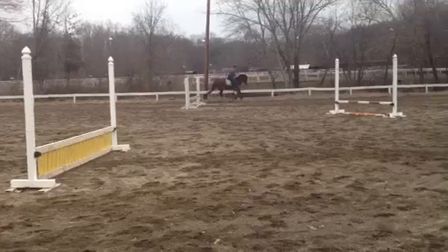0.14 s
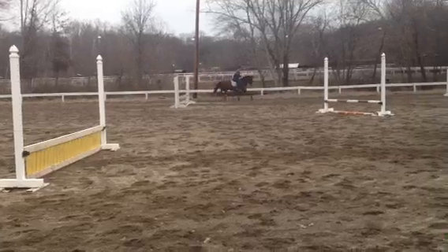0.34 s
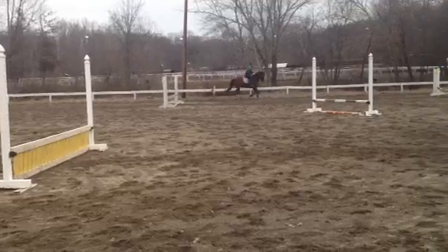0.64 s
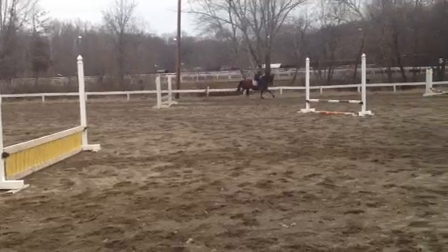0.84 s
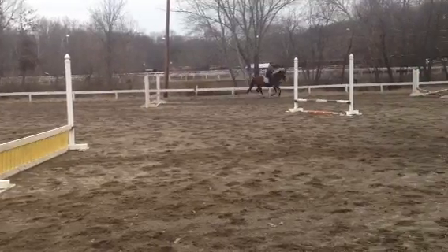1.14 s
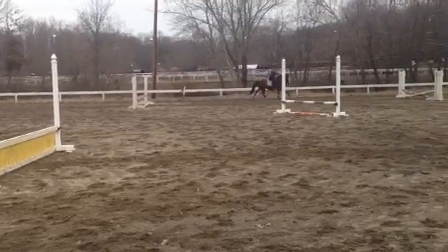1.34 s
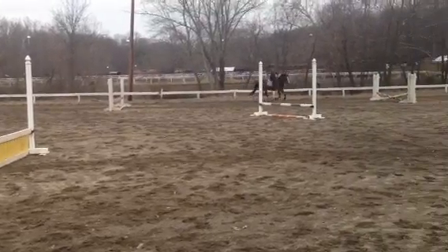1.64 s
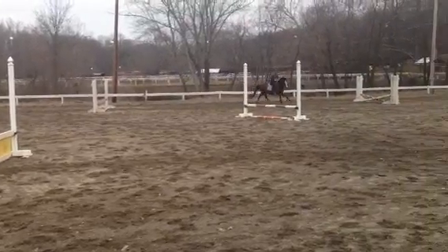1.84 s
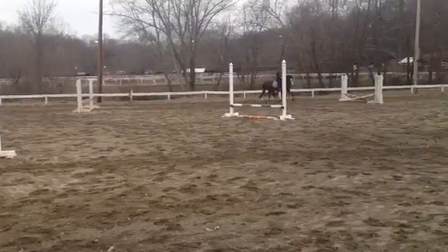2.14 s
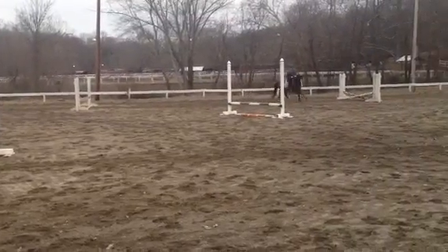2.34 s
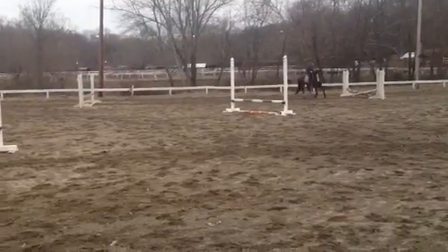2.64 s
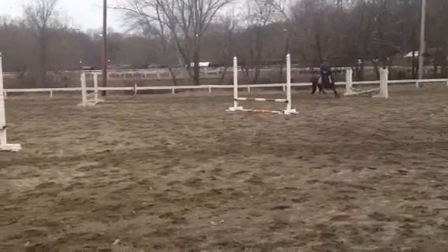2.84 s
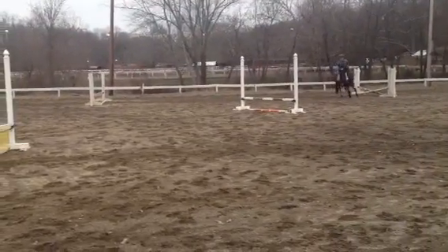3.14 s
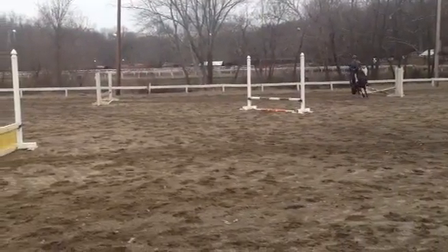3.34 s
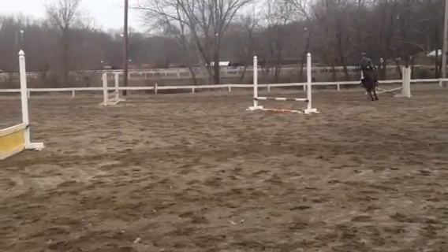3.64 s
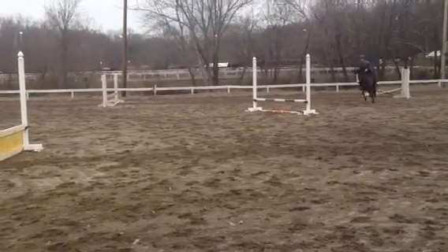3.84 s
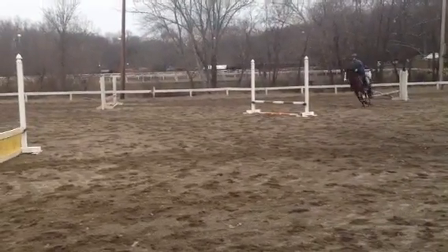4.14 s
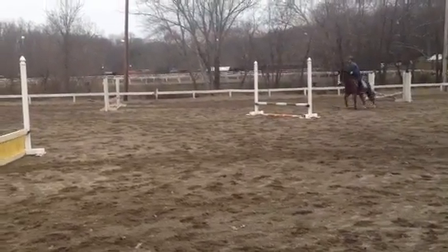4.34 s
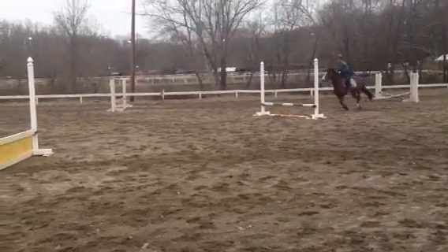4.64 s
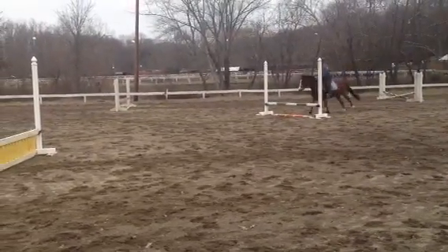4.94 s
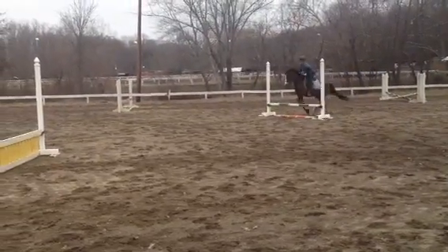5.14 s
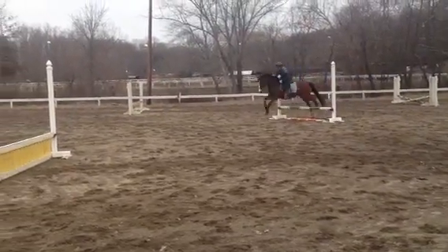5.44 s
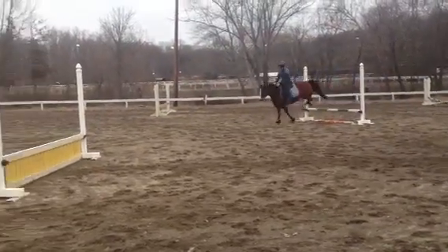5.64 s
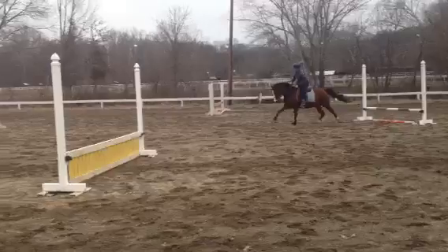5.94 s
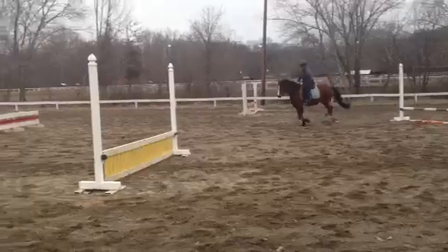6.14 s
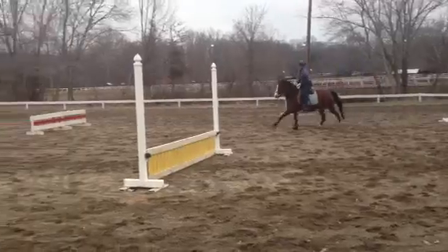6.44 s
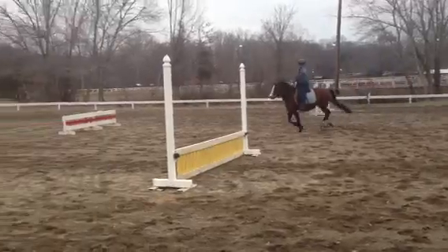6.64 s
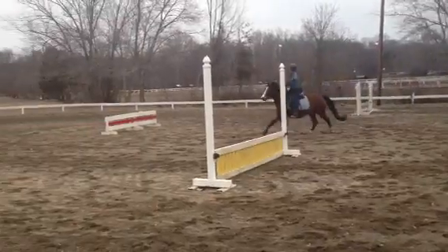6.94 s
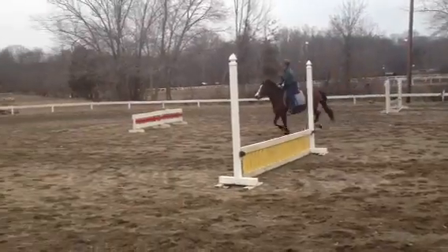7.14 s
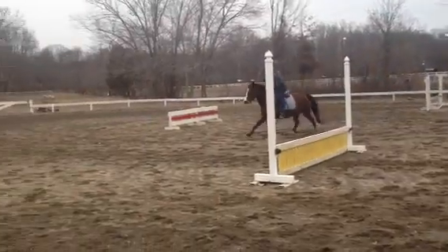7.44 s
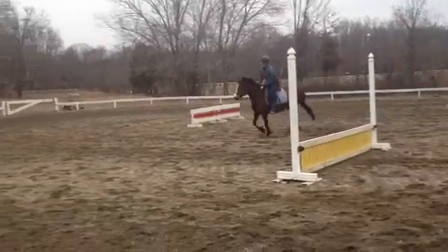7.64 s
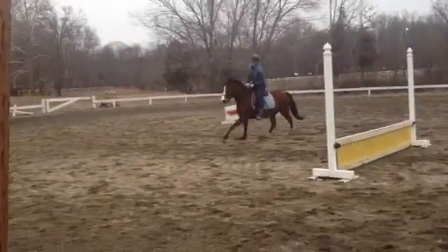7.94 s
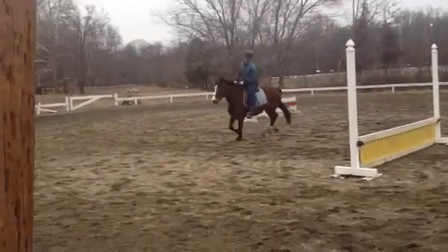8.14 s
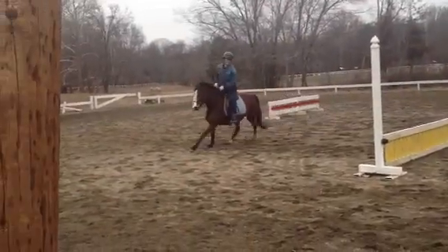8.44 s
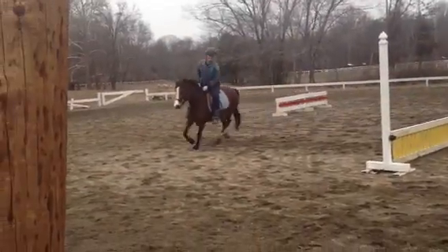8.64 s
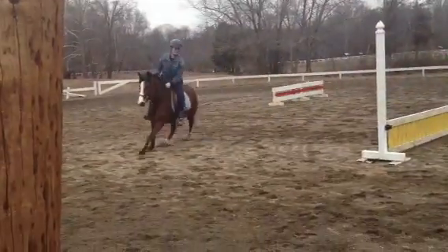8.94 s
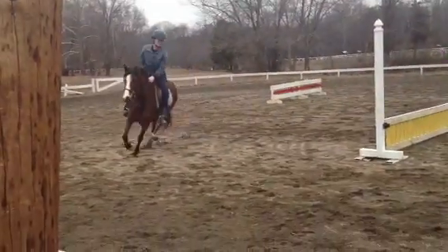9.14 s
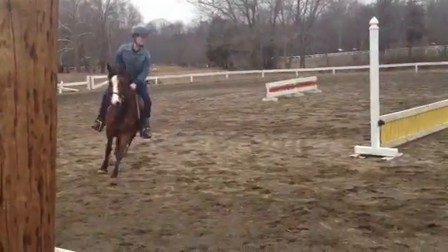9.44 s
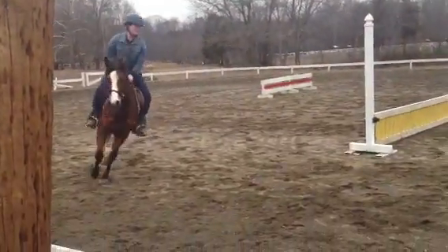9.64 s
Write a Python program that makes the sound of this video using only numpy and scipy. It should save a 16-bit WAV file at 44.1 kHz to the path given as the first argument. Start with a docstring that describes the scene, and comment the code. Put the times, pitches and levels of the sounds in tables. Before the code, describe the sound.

Mono outdoor sound with thin hiss and muffled low rumble. At first birds whistle over a wavering far engine, with a few small ticks and faint hoof thuds. The engine dies away as a horse canters in on soft footing, its thuds clustered and its kicked grit increasingly bright and close, with one harder hoof clack near the end.

```python
"""A horse canters round a dirt arena and comes up close: dull hoof thuds from short ringing modes,
sprays of grit from dense random grains, small clicks of tack from decaying noise.
A distant engine, a stack of fading harmonics, sinks in pitch as it fades, over the noise of far traffic.
Songbirds, gliding sine whistles, sing from the bare trees around the arena, which echo them."""
import sys
import numpy as np
from scipy import signal
from scipy.fft import rfft, irfft, next_fast_len
from scipy.io import wavfile
from scipy.ndimage import map_coordinates

SR = 44100
rng = np.random.default_rng(int(sys.argv[2]) if len(sys.argv) > 2 else 0)


def store_pcm(level_fs):
    """Save levels as 16-bit WAV."""
    pcm = np.round(np.clip(level_fs, -1, 1) * 32767).astype(np.int16)
    wavfile.write(sys.argv[1], SR, np.atleast_2d(pcm).T)


N = 432617

# hooves landing, scuffing and pushing off: [t/s, thud level/dB and kicked dirt level/dB before trims, spray t60/s]
FOOTFALLS = [(3.511, -29, -65, .12), (3.96, -43, -56, .15), (4.459, -30.5, -61, 0.11),
             (4.545, -31, -59, 0.14), (4.835, -31, -73, .1), (4.871, -31, -79, .1), (4.972, -28.5, -64, .2),
             (5.568, -32, -51, 0.046), (5.682, -29, -59, .12), (5.888, -38, -62, 0.11),
             (5.988, -25.5, -55, .2), (6.027, -29, -60, .25), (6.115, -37, -52, .25),
             (6.255, -35, -65, .15), (6.385, -30, -55, .08), (6.441, -30, -75, .1),
             (6.497, -27.5, -54, 0.075), (6.55, -40, -56, .27), (6.595, -30.5, -55, 0.18),
             (6.652, -47, -57, 0.058), (6.695, -29, -79, .1), (6.766, -41, -54, 0.069),
             (6.835, -27.5, -79, .1), (6.874, -27, -64, 0.11), (6.887, -35, -54.5, 0.1),
             (6.95, -31, -64, .1), (6.984, -47, -54.5, .2), (7.04, -29.5, -64, 0.11),
             (7.085, -29, -55, .22), (7.135, -36, -64, 0.14), (7.241, -33, -72, .1), (7.307, -33, -74, .1),
             (7.338, -46, -56, 0.22), (7.42, -31, -66, .2), (7.498, -31, -56.5, .15),
             (7.571, -45, -54, .16), (7.6, -43, -66, .1), (7.744, -50, -58, .1), (7.878, -44, -52.5, .16),
             (7.952, -39, -52, .2), (8.007, -39, -60, 0.13), (8.082, -45, -52.5, 0.19),
             (8.148, -50, -58, .08), (8.279, -45, -58, 0.09), (8.378, -42, -57, .15),
             (8.448, -41, -63, 0.12), (8.5, -52, -58, .25), (8.558, -36, -46.5, 0.15),
             (8.605, -45, -57, 0.19), (8.763, -37, -52, 0.1), (8.793, -44, -61, .064),
             (8.849, -58, -57, 0.11), (8.911, -42, -52.5, .13), (8.985, -50, -61, .25),
             (9.046, -31, -49.5, 0.15), (9.077, -35, -59, 0.11), (9.109, -42, -56, 0.11),
             (9.165, -29.5, -82, 0.11), (9.253, -38, -57, 0.13), (9.283, -40, -50, .03),
             (9.339, -42, -51, 0.033), (9.403, -32, -50, 0.13), (9.486, -33, -53.5, 0.19),
             (9.549, -34, -51, .13), (9.566, -46, -58, 0.19), (9.725, -30.5, -67, 0.069),
             (9.77, -42, -61, .078)]
# colour of falling grit and small stones: [f/Hz, relative level/dB]
GRIT_COLOUR = [(250, -15), (450, 12.5), (1000, 11), (2500, 11.5), (3600, 10), (4600, -2.5), (6600, 5),
               (9000, -6), (12000, 0), (15000, -12.5)]
# the near bird's hook, steep sweep and falling slur:
# [t into the phrase/s, length/s, lateness of the swell, [f/Hz at even steps, before shift and bow]]
NEAR_NOTES = [(0, .097, 3.3, [2300, 2285, 2275, 2300, 2470, 2730, 2810]),
              (0.115, .075, 0.85, [3130, 3300, 3620, 4120, 4750]),
              (0.241, 0.11, 0.91, [3060, 2977, 2888, 2810, 2760])]


def amp(db):
    """Decibels to gain."""
    return 10 ** (np.asarray(db) / 20)


def unit(x):
    """Scale to rms 1."""
    return x / np.sqrt(np.mean(x ** 2) + 1e-20)


def curve(rows):
    """Join (t/s, value) rows by straight lines, one value per sample."""
    return np.interp(np.arange(N) / SR, *np.transpose(rows))


def wobble(rate):
    """A smooth random curve around 0, rate knots a second."""
    knots = rng.standard_normal(int(N * rate / SR) + 4)
    return map_coordinates(knots, [np.arange(N) * rate / SR])


def coloured(x, points):
    """Filter x through a spectrum of (f/Hz, relative level/dB), then scale to rms 1."""
    size = next_fast_len(N + SR // 4)
    hz, db = np.transpose(points)
    bins_hz = np.fft.rfftfreq(size, 1 / SR)
    gain = amp(np.interp(np.log(bins_hz + 1), np.log(hz), db))
    return unit(irfft(rfft(x, size) * gain, size)[:N])


def noise(points):
    """Coloured noise of rms 1."""
    return coloured(rng.standard_normal(N), points)


def add(track, s, sound):
    """Mix a sound into the track at s seconds, trimming what falls outside."""
    start = round(s * SR)
    sound = sound[max(-start, 0):]
    part = track[max(start, 0):][:len(sound)]
    part += sound[:len(part)]


def blows(events, modes, attack, scatter):
    """Each blow of (t/s, peak/dB, pitch factor) rings the modes, a little detuned from spot to spot."""
    out, t = np.zeros(N), np.arange(SR // 5) / SR
    for s, db, pitch in events:
        detune = pitch * np.exp(scatter * rng.standard_normal())
        ring = np.zeros(len(t))
        for hz, level, t60 in modes:
            decay = amp(level + rng.normal(0, 1.8) - 60 * t / t60)
            ring += decay * np.sin(2 * np.pi * hz * detune * t)
        ring *= (1 - np.exp(-t / attack)) ** 2
        add(out, s, amp(db) * ring / np.abs(ring).max())
    return out


def rumble():
    """Low noise whose level drifts and trembles slightly."""
    # [t/s, level/dB before a trim]
    rumble_level = [(0, -49), (2.5, -52), (3.6, -52), (5.5, -52.5), (6.4, -49), (6.9, -47.5), (7.25, -50.5),
                    (8.3, -54), (8.95, -55), (9.15, -49.5), (9.8, -51)]
    # [f/Hz, relative level/dB]
    rumble_colour = [(25, -40), (45, -37), (65, -25.5), (90, -15), (120, -10), (155, -0.5), (205, -0.5),
                     (255, -2), (295, -6), (380, -17), (520, -37), (1000, -71)]
    trim_db, swing_db = 1.5, 0.53
    return noise(rumble_colour) * amp(curve(rumble_level) + trim_db + swing_db * wobble(14))


def traffic():
    """Far traffic merges into a steady rush of mid-band noise."""
    # [t/s, level/dB before a trim]
    traffic_level = [(0.0, -54.5), (5.98, -54.5), (6.78, -52.5), (8.93, -54), (9.81, -53)]
    # [f/Hz, relative level/dB]
    traffic_colour = [(150, -28), (350, 0), (520, -3), (700, 0), (950, 1), (1400, -3.5), (2000, -10),
                      (2700, -14.5), (3600, -16), (4400, -27.5), (7000, -38.5)]
    trim_db, swing_db = 1.5, 0.19
    return noise(traffic_colour) * amp(curve(traffic_level) + trim_db + swing_db * wobble(3.6))


def hiss():
    """A thin, steady treble noise."""
    # [f/Hz, relative level/dB]
    hiss_colour = [(1000, -30), (4000, -7), (5000, 1), (6600, 0.5), (8000, 2), (9500, -7), (12000, -0.5),
                   (15000, 0.5)]
    return amp(-72.5) * noise(hiss_colour)


def shimmer():
    """A faint high band of noise that swells and ebbs."""
    # [f/Hz, relative level/dB]
    shimmer_colour = [(4800, -28), (5800, 0.5), (6700, 1), (7700, -6.5), (9000, -34)]
    level_db, swing_db = -81, 2.5
    return noise(shimmer_colour) * amp(level_db + swing_db * wobble(5))


def engine():
    """Harmonics of a far engine's pulse rate; each fades in and out on its way through the air."""
    # falling engine speed: [t/s, pulse rate f/Hz]
    engine_speed = [(0, 19.9), (1, 20), (2, 19.05), (2.7, 19.76), (3.5, 18.8), (5.6, 17.96), (9.8, 17)]
    # the main harmonics: [multiple of the pulse rate, relative level/dB, depth of fading]
    drone_orders = [(8, -21, .3), (11, -12.5, .98), (12, -2.5, 0.74), (13, -1, 0.79)]
    # gain of the drone: [t/s, level/dB]
    drone_level = [(0, -47.5), (.9, -44.5), (1.4, -46.5), (1.85, -41.5), (2.3, -45), (2.6, -42),
                   (3.15, -41), (3.4, -48.5), (3.9, -42.5), (4.3, -50.5), (5.4, -46), (6.2, -54.5),
                   (9.8, -62.5)]
    # gain of the upper harmonics: [t/s, level/dB]
    upper_level = [(0, -91), (1.5, -65), (2.2, -64), (3, -64), (3.6, -78), (9.8, -93)]
    # the lowest line: [t/s, level/dB]
    hum_level = [(0, -60.5), (1, -63), (1.5, -68.5), (2.1, -62.5), (2.7, -62.5), (3.1, -73), (3.6, -64),
                 (4.4, -68.5), (5.5, -74), (9.8, -78)]
    phase = 2 * np.pi * np.cumsum(curve(engine_speed)) / SR

    def partial(order, blur, rate):
        """One harmonic at rms 1; random sidebands blur its level and phase."""
        fading = 1 + blur * (wobble(rate) + 1j * wobble(rate))
        carrier = np.exp(1j * (round(order) * phase + rng.uniform(0, 2 * np.pi)))
        return unit(np.real(fading * carrier))

    hum = partial(order=5, blur=0.2, rate=10)
    drone = sum(amp(db) * partial(order, blur, rate=24) for order, db, blur in drone_orders)
    upper = amp(1.5) * partial(order=24, blur=0.69, rate=32)
    upper += amp(-2.5) * partial(order=19, blur=1.8, rate=49)
    return hum * amp(curve(hum_level)) + drone * amp(curve(drone_level)) + upper * amp(curve(upper_level))


def twitters():
    """Faint, buzzy high calls of small birds far away: a sine with a fast-wavering pitch."""
    # [t/s, length/s, level/dB]
    calls = [(1.918, .14, -73), (2.96, .15, -71), (3.497, .17, -70.5), (3.97, .14, -78), (4.22, .07, -74),
             (5.03, .08, -73)]
    centre_hz, spread_hz = 5900, 260
    strength = np.zeros(N)
    for s, length, db in calls:
        add(strength, s, amp(db) * np.sqrt(np.abs(np.hanning(int(length * SR)))))
    return strength * np.sin(2 * np.pi * np.cumsum(centre_hz + spread_hz * wobble(300)) / SR)


def thin_call():
    """A single high thin whistle that rises and falls unsteadily."""
    # [t/s, f/Hz]
    glide = [(.06, 6360), (.17, 7150), (.29, 7450), (.37, 6860), (.46, 7370), (.56, 7500), (.66, 6910),
             (.76, 6400)]
    calling = curve([(glide[0][0], 0), (0.15, 1), (0.6, 1), (glide[-1][0], 0)])
    hz = curve(glide) + 150 * wobble(150)
    return amp(-78) * calling * np.sin(2 * np.pi * np.cumsum(hz) / SR)


def sing(notes):
    """Gliding, unsteady whistles from rows of (t/s, length/s, level/dB, lateness of the swell, f/Hz steps)."""
    warble_hz, warble_rate = 20.8, 110  # depth up to the slur's pitch; knots a second
    rise_hz = 516  # above the slur's pitch, e times rougher for each such step, up to 6 times
    slur_hz = NEAR_NOTES[-1][-1][0]
    song = np.zeros(N)
    warble = warble_hz * wobble(warble_rate)
    for s, length, db, lateness, pitch_hz in notes:
        u = np.linspace(0, 1, int(length * SR))
        hz = map_coordinates(np.array(pitch_hz, float), [u * (len(pitch_hz) - 1)], mode="nearest")
        roughness = np.clip(np.exp((hz - slur_hz) / rise_hz), 1, 6)
        hz += np.roll(warble, -round(s * SR))[:len(u)] * roughness
        swell = np.abs(np.sin(np.pi * u ** lateness)) ** 0.42
        add(song, s, amp(db) * swell * np.sin(2 * np.pi * np.cumsum(hz) / SR))
    return song


def far_bird():
    """The far songbird whistles an arch, a flick and a low note in each phrase."""
    # [t into the phrase/s, length/s, level/dB over the phrase, lateness of the swell, [f/Hz at even steps]]
    far_notes = [(-.015, .095, -1, 1.18, [2785, 3100, 3290, 3314, 3260]),
                 (.108, .05, -2.5, 1.3, [3800, 3736, 3660, 3280, 3157]),
                 (.185, .08, -5, 1.2, [2306, 2207, 2170, 2214, 2290])]
    # [t/s, level/dB]
    far_phrases = [(2.29, -62), (2.768, -58.5), (3.238, -62.5), (3.71, -61), (4.2, -63), (7.18, -56.5),
                   (7.66, -57), (8.152, -58), (8.635, -57.5)]
    return sing([(s + delay, length, db + note_db, lateness, pitch_hz)
                 for s, db in far_phrases
                 for delay, length, note_db, lateness, pitch_hz in far_notes])


def near_bird():
    """The near songbird whistles a hook, a steep sweep and a slur, shifted in pitch from phrase to phrase."""
    # [t/s, pitch shift f/Hz, upward bow of the slur f/Hz, hook level/dB, sweep level/dB, slur level/dB]
    near_phrases = [(-.232, 2, 0, -57, -66, -51.5), (.335, 18, -13, -56, -63, -53),
                    (2.166, -19.5, -22, -58, -73, -59), (2.735, -26, -19, -58, -72, -58),
                    (3.305, -21, -17, -57.5, -78, -57), (4.963, 59.5, 69, -61, -67, -48.5),
                    (5.512, -1, 0, -53.5, -64, -48), (6.056, -19.5, 164, -55, -67, -52),
                    (9.097, 6, 3, -59.5, -76, -56), (9.667, 6, 0, -55, -75, -55)]
    notes = []
    for s, shift_hz, bow_hz, *levels_db in near_phrases:
        for (delay, length, lateness, pitch_hz), db, bow in zip(NEAR_NOTES, levels_db, (0, 0, bow_hz)):
            arch = np.sin(np.linspace(0, np.pi, len(pitch_hz)))
            notes.append((s + delay, length, db, lateness, np.add(pitch_hz, shift_hz) + bow * arch))
    return sing(notes)


def birds():
    """All the birds together, with a soft diffuse echo from the trees and a few distinct ones."""
    # single trunks and the fence answer: [delay t/s, level/dB]
    tree_echoes = [(.041, -13), (.066, -20.5), (.118, -23)]
    song = near_bird() + far_bird() + twitters() + thin_call()
    song *= amp(3.1 * wobble(90))  # moving air makes the notes flutter
    t = np.arange(SR) / SR
    trees = rng.standard_normal(SR) * amp(-60 * t / 0.68)  # t60 of 0.68 s
    echo = amp(-8.5) * signal.fftconvolve(song, trees / np.linalg.norm(trees))[:N]
    for delay, db in tree_echoes:
        add(echo, delay, amp(db) * song)
    return song + echo


def tack():
    """Buckles and stones tick: very short bursts of bright noise."""
    # [t/s, level/dB before a trim, t60/s]
    ticks = [(.363, -41, .012), (1.483, -44, .026), (2.707, -34, .026), (2.839, -48, .045),
             (3.149, -29.5, .01), (3.2207, -43, .026), (4.94, -45, .026), (4.996, -47, .026),
             (5.014, -45, .026), (6.239, -34.5, .026), (6.8223, -43, .026), (7.773, -37, 0.016),
             (8.3546, -42, .012), (8.376, -41, .026), (8.382, -39.5, .026), (8.5646, -39, .02),
             (9.3234, -39, .014), (9.3434, -42, .026), (9.614, -38, .026)]
    # [f/Hz, relative level/dB]
    tick_colour = [(1500, 12.5), (4000, -10), (6500, 4.5), (9000, 2.5), (12000, 6.5), (15000, -1)]
    trim_db, attack_s = -7.0, 0.001
    strength, t = np.zeros(N), np.arange(SR // 20) / SR
    for s, db, t60 in ticks:
        add(strength, s, amp(db + trim_db - 60 * t / t60) * (1 - np.exp(-t / attack_s)))
    return strength * noise(tick_colour)


def crumbs():
    """Single small stones land at random as short noise bursts, clearer as the horse comes near."""
    count, first_s, span_s, t60_s = 70, 5.2, 3.5, 0.031
    strength, t = np.zeros(N), np.arange(SR // 50) / SR
    for place, size in rng.random((count, 2)):
        db = -69.5 + 5.7 * place + 11.5 * size ** 2
        add(strength, first_s + span_s * place, amp(db - 60 * t / t60_s))
    return strength * noise(GRIT_COLOUR)


def dirt():
    """Kicked dirt patters down after each hoof: random grains of grit and dust, falling in clods."""
    # loose dirt trickling between the sprays: [t/s, level/dB]
    trickle = [(0, -77), (2, -70.5), (3, -67.5), (3.6, -74), (5.5, -71), (6.2, -68.5), (7.4, -78.5),
               (8.2, -76.5), (8.7, -72.5), (9.1, -69), (9.5, -67.5), (9.8, -72.5)]
    # fine dust is only heard close by: [t/s, level/dB against the grit, before a trim]
    nearness = [(0, -35), (7, -8), (8, -3.5), (8.7, -2.5), (9.4, -3.5), (9.8, 2)]
    # [f/Hz, relative level/dB]
    dust_colour = [(4000, -13), (8500, 1.5), (11500, -0.5), (13500, -2), (15500, -4)]
    attack_s, hold_s = 0.0027, 0.008  # the hoof slides for the hold before the spray dies away
    spray_trim_db, dust_trim_db, trickle_swing_db = -6.5, -2.5, 2.0
    grain_share, grain_swing_db = 0.08, 1.5  # share of samples that hold a grain; how unevenly they fall
    clod_swing_db, clod_rate = 1.97, 100  # depth, knots a second

    def grains():
        """Sparse random impulses of uneven strength."""
        falling = rng.random(N) < grain_share
        strength_db = 0.73 * rng.standard_normal(N) + grain_swing_db * wobble(420)
        return rng.standard_normal(N) * falling * amp(strength_db)

    flow, t = np.zeros(N), np.arange(SR // 4) / SR
    for s, _, db, t60 in FOOTFALLS:
        spray = (1 - np.exp(-t / attack_s)) * amp(-60 * np.maximum(t - hold_s, 0) / t60)
        add(flow, s, amp(db + spray_trim_db) * spray / spray.max())
    flow += amp(curve(trickle) + trickle_swing_db * wobble(22))
    clods = amp(clod_swing_db * wobble(clod_rate) + 1.5)
    dust = amp(curve(nearness) + dust_trim_db) * coloured(grains(), dust_colour)
    return (coloured(grains(), GRIT_COLOUR) + dust) * clods * flow


def clacks():
    """A hoof meets something hard, which rings briefly in several high modes."""
    # [t/s, peak level/dB]
    hits = [(5.568, -47), (7.972, -45), (8.851, -34.5)]
    # [f/Hz, relative level/dB, t60/s], before random detuning and level scatter
    clack_modes = [(1480, 0, .018), (1780, 1, 0.013), (2200, -5, .012), (2600, -1, 0.023), (2950, -3, .012),
                   (3250, -1.5, .013)]
    return blows([(s, db, 1) for s, db in hits], clack_modes, attack=0.00038, scatter=0.03)


def hooves():
    """Soft ground rings in a few low modes; it swallows the attack and carries neither deep bass nor treble."""
    # the footing: [f/Hz, relative level/dB, t60/s], before pitch factor, detuning and level scatter
    ground_modes = [(150, -6, 0.027), (197, 1.5, 0.06), (241, -2, 0.036)]
    # softer footing sounds deeper: [t/s, factor on the modes' pitch]
    ground_pitch = [(4.9, 1.12), (6, 0.99), (6.8, 0.95), (7.4, 0.83), (8.5, 0.986), (9.8, 1)]
    low_hz, high_hz, trim_db = 118, 340, -3.0
    landings = [(s, db, np.interp(s, *np.transpose(ground_pitch))) for s, db, _, _ in FOOTFALLS]
    thuds = blows(landings, ground_modes, attack=0.0029, scatter=0.069)
    band = signal.butter(3, [low_hz, high_hz], "bandpass", fs=SR, output="sos")
    return amp(trim_db) * signal.sosfilt(band, thuds)


def scene():
    """The horse in front, everything else behind it, in one channel."""
    background = rumble() + traffic() + hiss() + shimmer()
    horse = tack() + crumbs() + dirt() + clacks() + hooves()
    return (background + engine() + birds() + horse)[None]


def record(dry):
    """A sharp band limit passes nothing from its top frequency upward."""
    top_hz = 15400
    size = next_fast_len(N + SR // 4)
    passed = np.fft.rfftfreq(size, 1 / SR) < top_hz
    return irfft(rfft(dry, size) * passed, size)[:, :N]


dry = scene()
out = record(dry)
store_pcm(out)
```